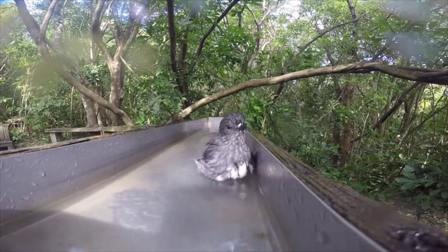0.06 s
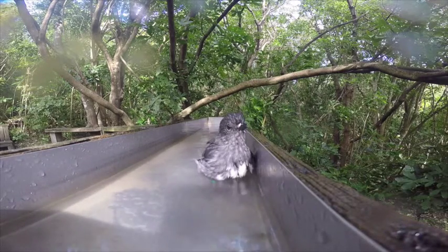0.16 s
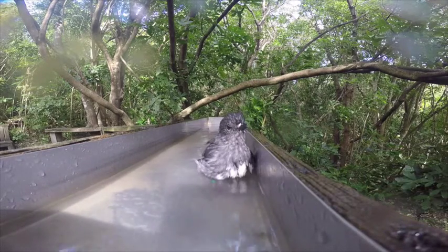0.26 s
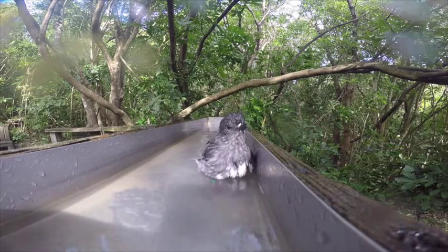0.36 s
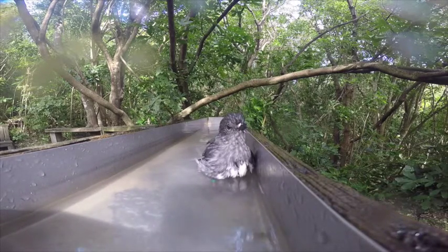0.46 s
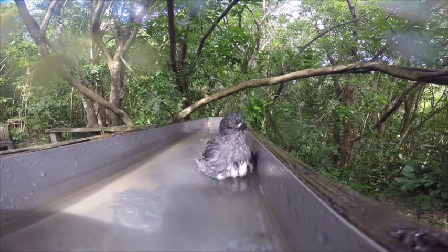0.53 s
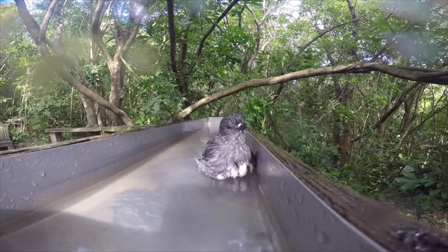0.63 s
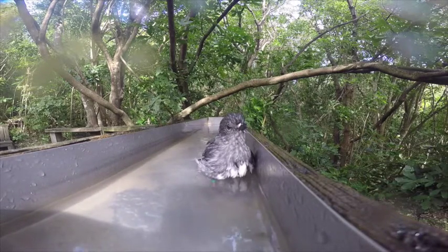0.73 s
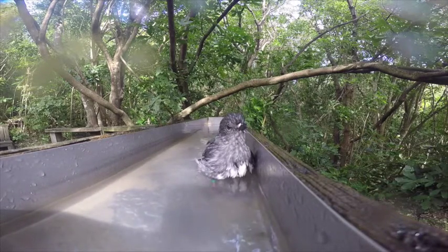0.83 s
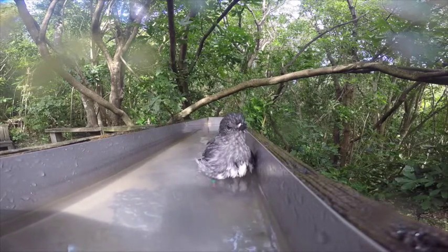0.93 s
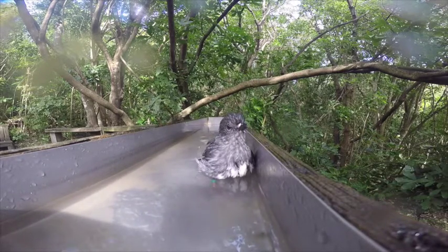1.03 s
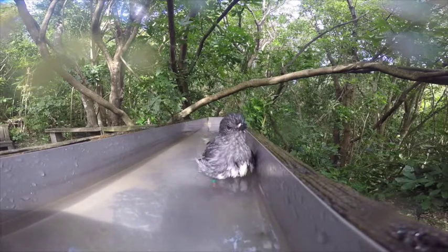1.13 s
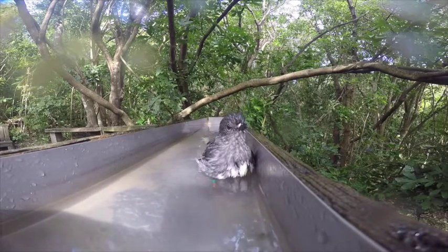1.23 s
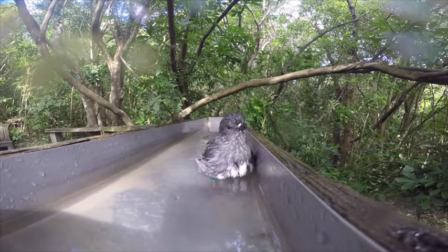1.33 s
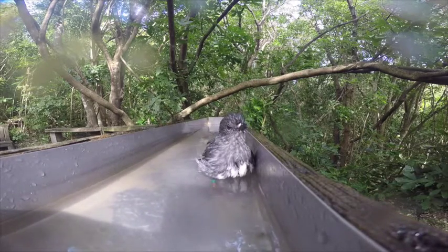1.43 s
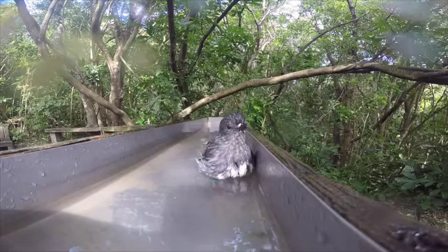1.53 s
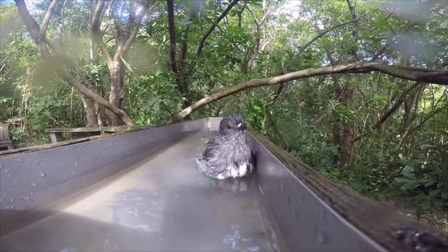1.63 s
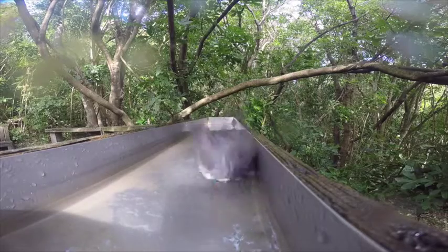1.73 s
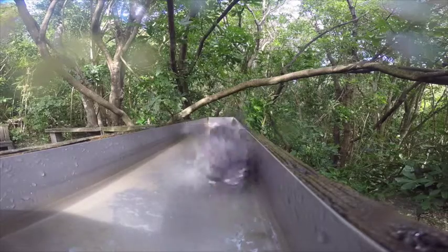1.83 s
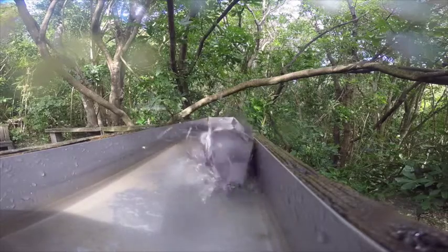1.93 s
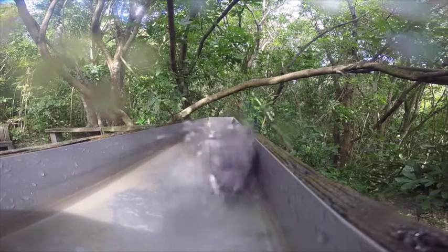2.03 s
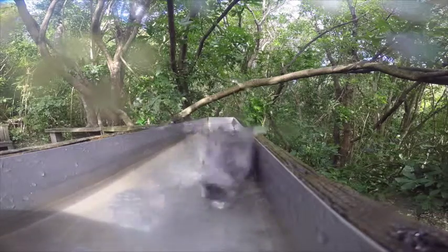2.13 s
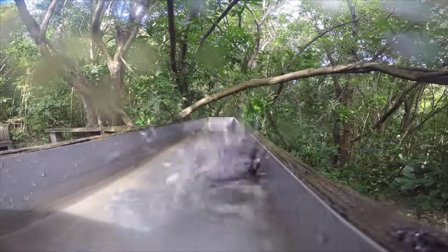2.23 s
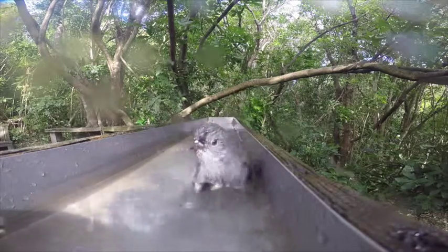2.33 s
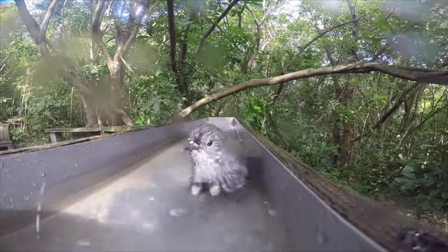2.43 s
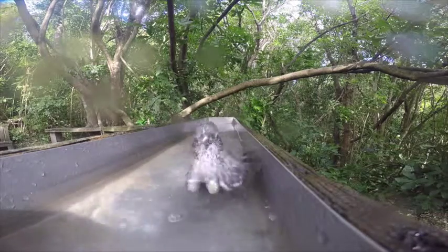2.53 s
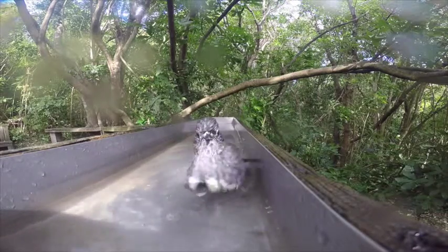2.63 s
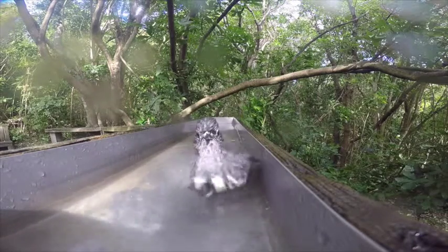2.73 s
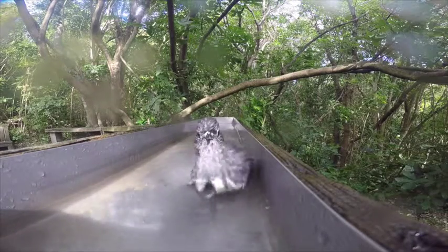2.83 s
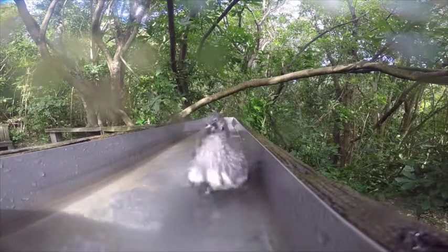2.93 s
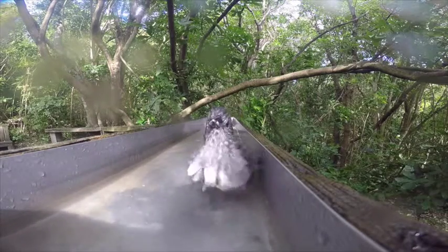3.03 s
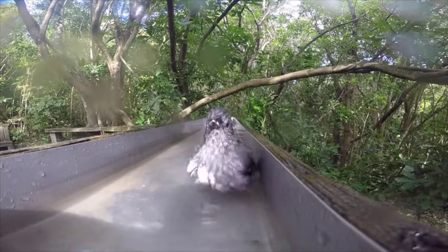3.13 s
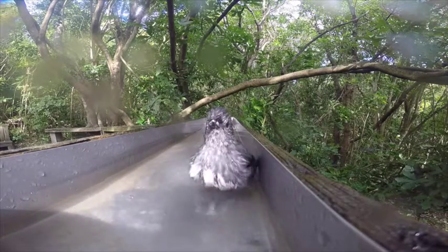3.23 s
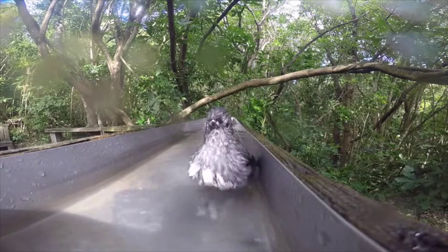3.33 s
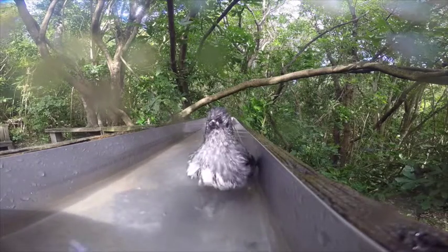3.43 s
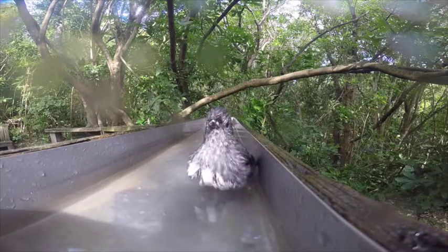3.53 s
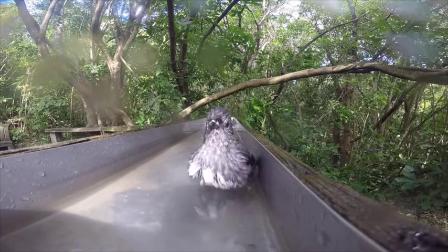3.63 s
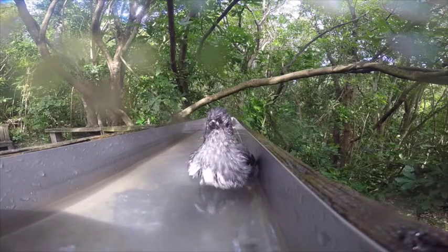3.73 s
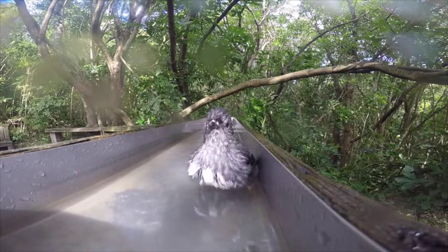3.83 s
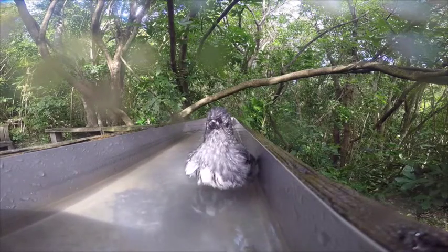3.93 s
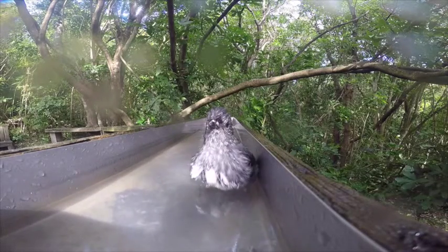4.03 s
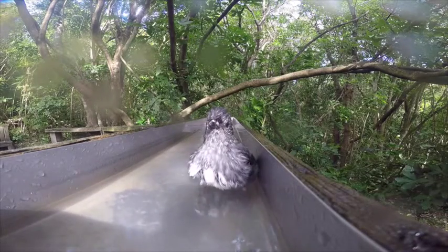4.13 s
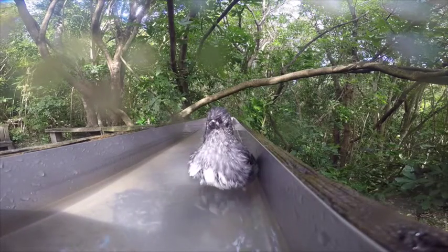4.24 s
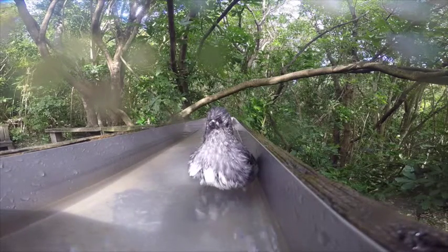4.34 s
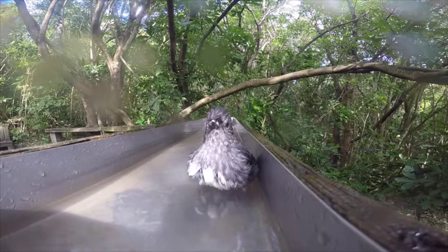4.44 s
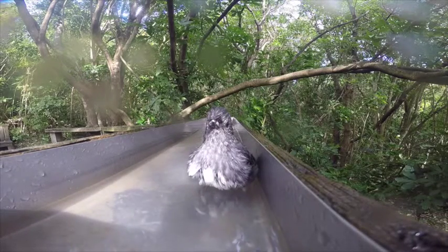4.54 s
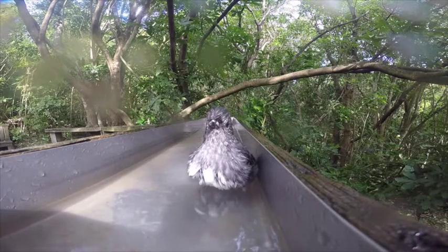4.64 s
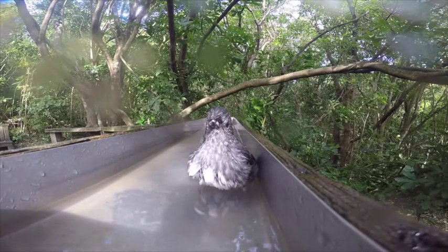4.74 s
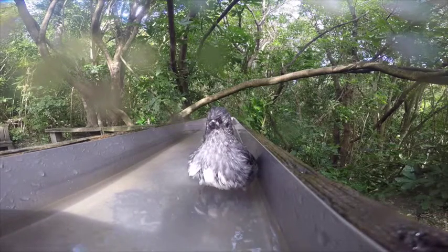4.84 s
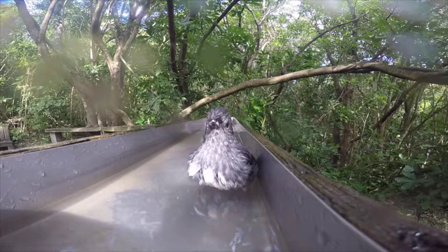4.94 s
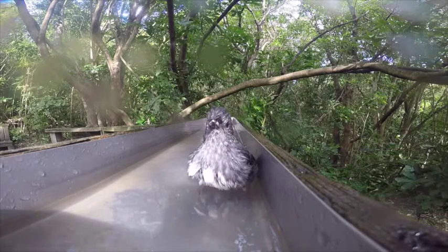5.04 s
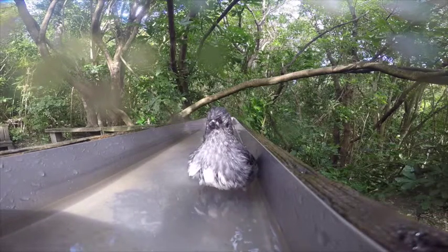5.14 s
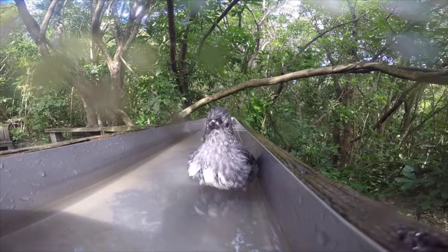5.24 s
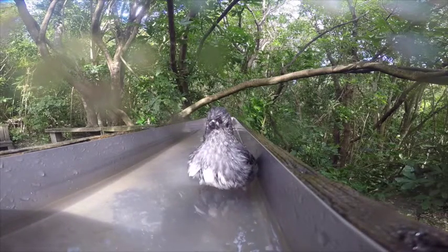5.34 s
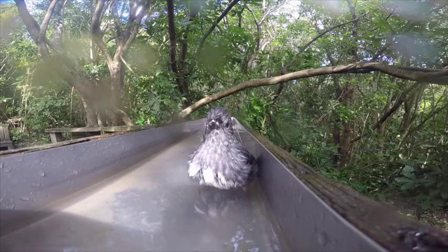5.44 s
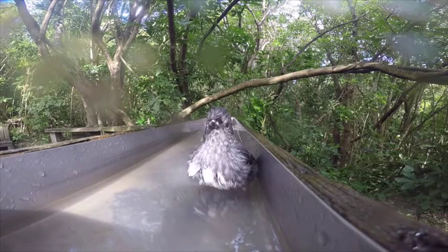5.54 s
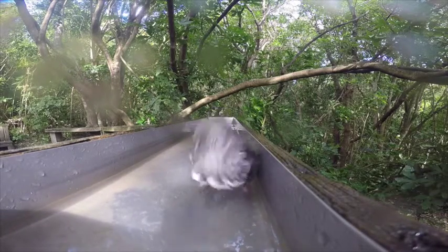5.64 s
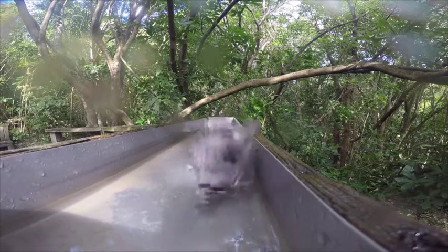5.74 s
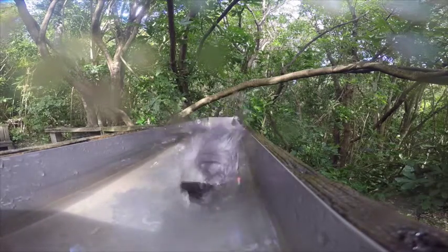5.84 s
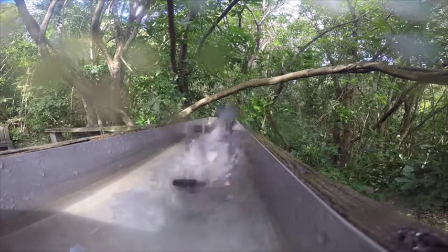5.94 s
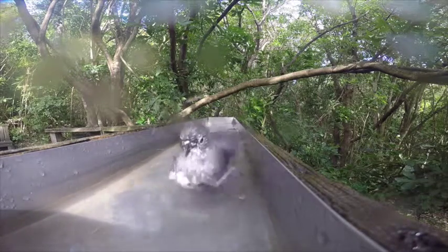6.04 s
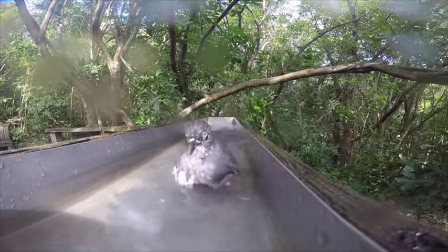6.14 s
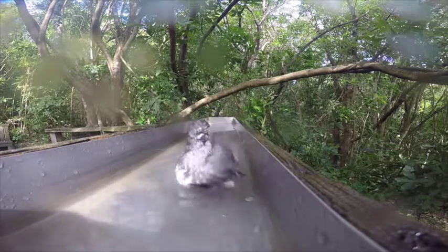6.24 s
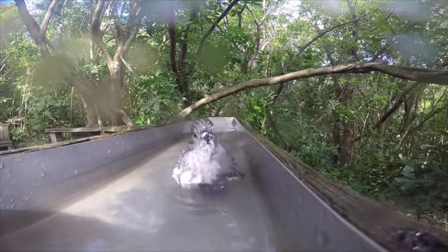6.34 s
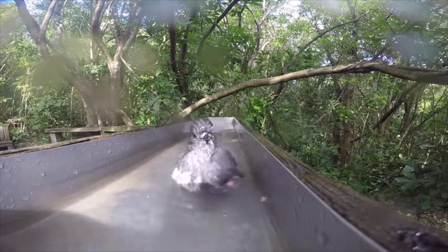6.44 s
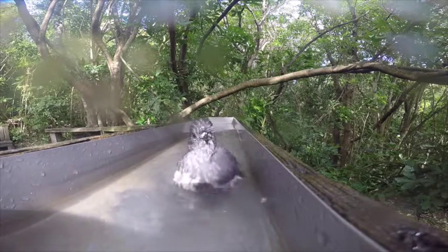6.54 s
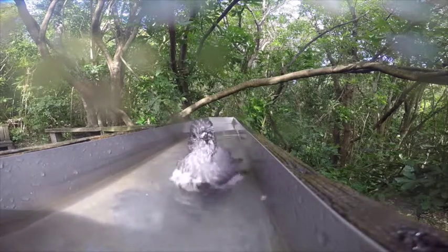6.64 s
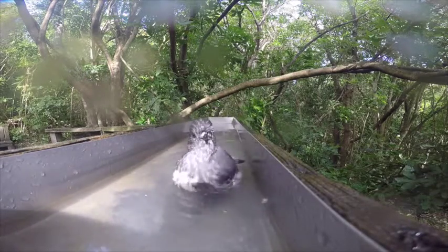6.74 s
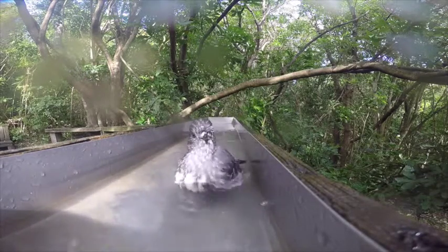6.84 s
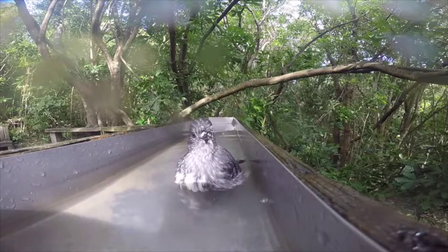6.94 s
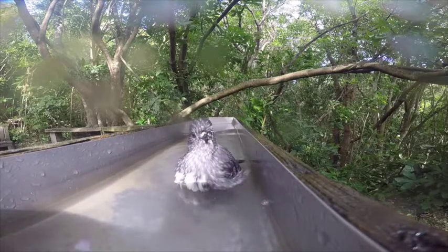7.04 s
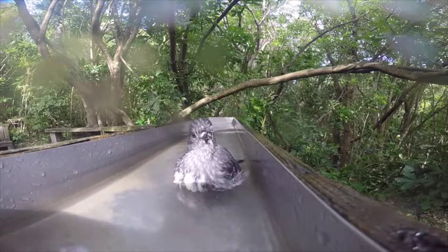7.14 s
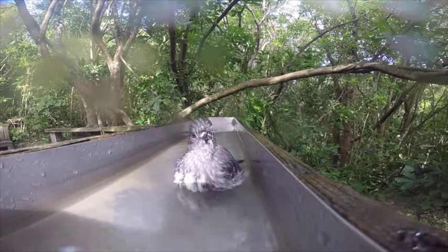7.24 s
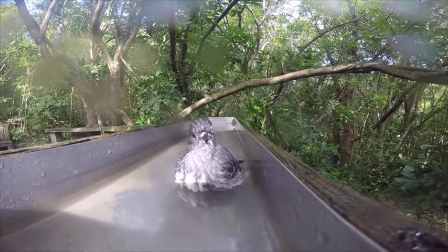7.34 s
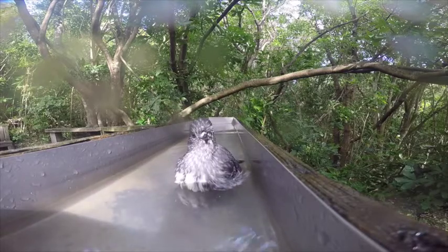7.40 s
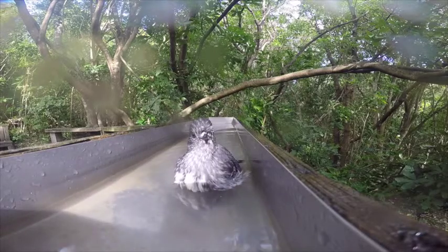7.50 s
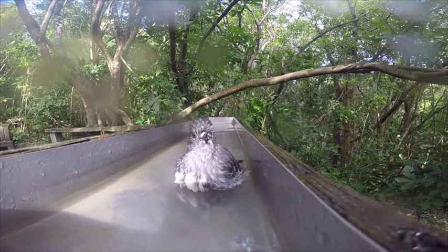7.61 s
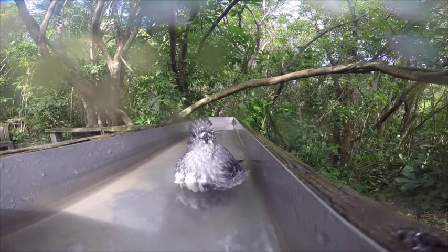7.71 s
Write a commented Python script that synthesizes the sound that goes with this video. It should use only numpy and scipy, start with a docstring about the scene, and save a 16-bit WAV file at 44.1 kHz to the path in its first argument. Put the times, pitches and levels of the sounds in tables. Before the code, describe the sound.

A small bird bathes in a shallow metal trough, heard close up in still woodland. It starts quietly, with soft air and a tiny wet tap. At about 1.7 seconds feathers swish, and the bird plunges with a hollow slap and a sharp metallic knock. Rapid wingbeats churn the water, loudest until 2.4 seconds, with pattering spray, ticking drops, small bubbles and a low boom from the trough floor. Lighter flutters continue until about 3.3 seconds. A pause follows, with faint laps and one small splash at 4 seconds. The second bout begins around 5.7 seconds with another plunge and knock, then quick splashing strokes that fade out by 7 seconds. The rest is quiet until the end, near 8 seconds. Very faint distant bird whistles come around 3.5, 5.2 to 5.6 and 7.5 seconds, and a barely audible thin electronic whine runs throughout.

```python
"""A shallow metal trough in still woodland, where a small bird bathes in two bouts.
Feet and wings knock and slosh, the breast plunges, feathers swish; the walls ring and the floor booms.
On top sits the wet detail: spray patters in sheets, drops tick, pockets of air ping as bubbles.
The pauses hold faint laps, soft air, far birds and the thin whine of a camera resting on the metal."""
import sys
import numpy as np
from scipy import signal
from scipy.fft import rfft, irfft, next_fast_len
from scipy.io import wavfile
from scipy.ndimage import uniform_filter1d

SR = 44100
rng = np.random.default_rng(int(sys.argv[2]) if len(sys.argv) > 2 else 0)


def master_out(mix):
    """Clip the mix to full scale and print it as 16-bit PCM to the path in sys.argv[1]."""
    frames = np.transpose(np.atleast_2d(mix))
    ceiling = np.clip(frames, -1, 1)
    pcm = np.round(ceiling * 32767).astype(np.int16)
    wavfile.write(sys.argv[1], SR, pcm)


N = 342657
T = np.arange(N) / SR

# strong wing strokes, each a knock and a sheet of spray: t/s, knock/dB, brightness/dB, spray/dB
WING_STROKES = [(0.002, -46.5, 0, -50.5), (1.792, -49, -8, -50), (1.8517, -21, -3, -43.5),
                (1.9295, -38, 11, -37), (2.019, -30, -1, -46), (2.07, -36.5, -1, -53),
                (2.093, -36, -4, -46.5), (2.169, -32, -0.5, -59), (2.195, -51, -9, -41.5),
                (2.248, -29, -8.5, -41), (2.298, -41, 2, -50), (2.34, -41.5, 6.5, -44),
                (2.521, -44.5, -1, -51.5), (2.62, -43, 2.5, -53.5), (2.79, -43.5, -3, -55),
                (3.141, -38.5, -5, -54.5), (3.173, -41.5, -3, -70), (3.231, -51, -4, -67),
                (4.0, -50.5, -1.5, -53), (5.722, -32.5, 3, -42.5), (5.7918, -22.5, -3, -41),
                (5.934, -38, 0.5, -41.5), (6.001, -39.5, 9.5, -38.5), (6.089, -45, 2, -45.5),
                (6.205, -38.5, -3, -52), (6.268, -40, -2.5, -51), (6.328, -33, -4, -47),
                (6.394, -32.5, -6.5, -48.5), (6.458, -34.5, -5.5, -52.5), (6.553, -42.5, -4, -55),
                (6.609, -39.5, -3, -51), (6.76, -46, -0.5, -58)]
# how hard the bird works the water, one curve a bout: t/s, level/dB
BOUT_EFFORT = [
    [(1.69, -66.5), (1.87, -37.5), (2.04, -34.5), (2.27, -34), (2.41, -44.5), (2.84, -45), (3.0, -52.5),
     (3.21, -45), (3.36, -72.5), (3.8, -74), (4.35, -75)],
    [(5.63, -66.5), (5.76, -44.5), (5.83, -38), (5.93, -45), (6.14, -48), (6.41, -44.5), (6.56, -45.5),
     (6.8, -49.5), (6.96, -70.5)],
]
# a knock's thud, body and clank: low f/Hz, high f/Hz, gain/dB
KNOCK_EQ = [(162, 753, -4), (807, 1320, 1.5), (1264, 3860, 1.5)]
# the trough's distinct modes: f/Hz, level/dB, t60/s
TROUGH_MODES = [(192, -13.5, 0.57), (264.4, -16, 0.55), (324, -7.5, 0.25), (357, -14.5, 0.6),
                (410.8, -5, 0.18), (483.6, -4.5, 0.0833), (515.3, -3, 0.1), (594, -17, 0.56),
                (620.6, 0.5, 0.091), (820, -15.5, 0.72), (878.8, -4.5, 0.217), (948, -16, 0.23),
                (1069, -9, 0.17), (1197, -13, 0.12), (1294, -6.5, 0.1), (1618, -11, 0.13),
                (1787, -10, 0.096), (1944, -10, 0.076), (2220, -8, 0.063), (2445, -21, 0.15),
                (2583, -5, 0.063)]
# tone of the dense wall modes: f/Hz, level/dB
WALL_EQ = [(90, 11), (200, -4), (550, 1), (720, -2.5), (900, 14), (1250, 2.5), (1450, -11.5), (1700, 0),
           (2050, -7), (2600, -4.5), (2850, -22), (4200, -17), (7000, -44.5), (16000, -77)]
# ring time of the dense wall modes: f/Hz, t60/s
WALL_DECAY = [(100, 0.73), (400, 0.21), (1000, 0.14), (2500, 0.22), (8000, 0.035)]
# the breast hits the water: t/s, level/dB, f/Hz
BREAST_PLUNGES = [(1.854, -13.5, 464), (2.117, -14.5, 322), (2.2499, -16, 342), (5.792, -13, 510)]
# the bird's weight rocks the floor: t/s, level/dB, hold/s
FLOOR_PRESSES = [(0.0, -45, 0.015), (1.94, -24.5, 0.08), (2.112, -19.5, 0.43), (2.961, -31, 0.04),
                 (3.16, -31.5, 0.1), (4.0, -54, 0.12), (5.782, -22.5, 0.19), (6.318, -33, 0.2),
                 (6.57, -33, 0.28)]
# low end of the water's heaving bulk: f/Hz, level/dB
HEAVE_EQ = [(15, -39), (30, -15.5), (55, -5), (72, 3.5), (88, -16.5), (108, 0.5), (122, 4), (150, 2),
            (200, -16.5), (280, -16), (600, -71)]
# feathers swish through the water, and faint laps touch the walls in the pauses: t/s, length/s, level/dB
WATER_SWISHES = [(0.55, 0.036, -61), (1.724, 0.057, -48.5), (1.822, 0.028, -30.5), (1.88, 0.029, -39),
                 (3.48, 0.05, -64.5), (3.645, 0.029, -61), (3.78, 0.015, -60.5), (3.93, 0.13, -52),
                 (4.304, 0.0286, -61.5), (5.652, 0.042, -46), (5.735, 0.08, -39.5), (6.8, .06, -49)]
# tone of spray and froth: f/Hz, level/dB
SPRAY_EQ = [(1500, 24.5), (3000, 9), (4200, 14.5), (5000, 0.5), (5700, 8.5), (7000, -1.5), (9000, -14),
            (10200, -3.5), (11800, -17), (13700, -5), (15200, -11.5)]
# the largest bubbles and wet squeaks: t/s, f/Hz, level/dB, fuzz/0-1
BIG_BUBBLES = [(1.887, 14400, -42.5, .9), (1.927, 2440, -19.5, 0.36), (2.022, 2470, -32.5, 0.15),
               (2.07, 1820, -29, 0.3), (2.137, 1690, -17.5, 0.8), (2.297, 2287, -29, 1),
               (2.31, 10400, -47, 0.4), (2.853, 2240, -33, .05), (3.126, 3700, -47.5, 0.5),
               (5.664, 10300, -36.5, 0.4), (5.68, 9200, -45.5, 0.8), (6.003, 1785, -33, 0.5),
               (6.045, 15100, -41.5, .9), (6.56, 1990, -42, 0.3), (6.611, 7000, -46.5, .9)]
# the closest drops: t/s, level/dB, f/Hz
NEAR_DROPS = [(1.962, -28.5, 4400), (2.005, -32, 8100), (2.1013, -34.5, 4300), (2.241, -37.5, 3980),
              (4.002, -44.5, 7000), (5.9642, -33, 4350), (5.987, -32, 4680), (6.177, -36.5, 6930),
              (6.243, -36, 4530), (6.298, -25.5, 4290), (6.66, -34.5, 4360)]
# tone of the still air: f/Hz, level/dB
AIR_EQ = [(10, -11.5), (30, 2), (100, -11.5), (200, -19), (400, -23.5), (1200, -28.5), (3000, -31),
          (5900, -33), (7200, -36.5), (10000, -39), (15000, -41.5)]
# far birds' whistles and a thin wheeze: t/s, length/s, f/Hz, level/dB, waver/Hz
FAR_CALLS = [(3.546, 0.54, 4420, -71, 136), (3.58, 0.51, 11000, -79, 190), (5.152, 0.27, 1745, -67, 11),
             (5.48, 0.17, 1830, -60.5, 9), (7.477, 0.24, 1635, -61.5, 6)]


def wingbeats(per_s=14, bright_db=-4, spray_db=-12, spread_db=-0.5, jitter_s=0.008):
    """The rhythm: lighter beats, as hard as the effort, fill in between the strong strokes."""
    beats = list(WING_STROKES)
    for (start, *_), (end, *_) in zip(WING_STROKES, WING_STROKES[1:]):
        for s in np.linspace(start, end, round((end - start) * per_s) + 1)[1:-1]:
            late, hard, wet = rng.standard_normal(3)
            db = effort_db(s)
            knock_db, sheet_db = db + spread_db * hard, db + spray_db + spread_db * wet
            beats.append((s + jitter_s * late, knock_db, bright_db, sheet_db))
    return [beat for beat in beats if beat[1] > -100]  # skip the silent beats


def knocks(taps, beats, slop=0.17, slop_s=0.0044, hard_db=-22, soften=0.16):
    """Each blow hits the metal with a sharp push and a short slop; lighter blows are more slop."""
    out, t = np.zeros(N), T[:SR // 10]
    for k, (s, knock_db, bright_db, _) in enumerate(beats):
        levels = knock_db + bright_db * np.array([-1, 0, 1])  # brightness trades thud for clank
        wet = slop * amp(soften * (hard_db - max(levels)))
        push = wet * patter(len(t), 4000, 1.18) * np.exp(-t / slop_s)
        push[0] = 1  # the hard attack
        rung = signal.fftconvolve(push, taps[k % len(taps)])
        for db, (lo, hi, gain_db) in zip(levels, KNOCK_EQ):
            add(out, s, amp(db + gain_db) * crest(band(rung, lo, hi)))
    return out


def trough_tap(wall_db=4, flex_db=-4):
    """The trough's answer to one tap: a first flex, a wash of dense wall modes and distinct ringing."""
    t = T[:SR * 3 // 4]
    hz, frame_s, noise = signal.stft(rng.standard_normal(len(t)), SR, nperseg=256)
    decay = amp(-60 * frame_s / curve_at(WALL_DECAY, hz)[:, None])
    wash = signal.istft(noise * decay, SR, nperseg=256)[1][:len(t)]
    flex = signal.unit_impulse(len(t), 24)
    wall = unit(eq(unit(wash) + amp(flex_db) * unit(flex), WALL_EQ) * (t < t[-1] / 2))
    # each mode starts up or down, by where the tap lands
    ring = sum(rng.choice([-1, 1]) * amp(db - 60 * t / t60) * np.sin(2 * np.pi * f * t)
               for f, db, t60 in TROUGH_MODES)
    return unit(ring) + amp(wall_db) * wall


def plunges(taps, ring_db=-9, cycles=0.89):
    """The breast lands with a hollow slap of a couple of cycles; the walls give it a ringing tail."""
    out, t = np.zeros(N), T[:SR // 2]
    for k, (s, db, hz) in enumerate(BREAST_PLUNGES):
        slap = np.sin(2 * np.pi * hz * t) * np.exp(-(hz * t / cycles - 0.5) ** 2)
        tail = crest(signal.fftconvolve(slap, taps[k % len(taps)])[:len(t)])
        add(out, s, amp(db) * (slap + amp(ring_db) * tail))
    return out


def floor_boom(stir, surge, boom_hz=85.8, jostle_hz=15, most_hz=13, upper_hz=135, upper_db=-19,
               rise_s=0.055, free_db_per_s=44, damped_db_per_s=38, calm_db=-54):
    """The floor's lowest mode: its pitch is jostled while the bird moves, a pure hum as it dies away."""
    damping = stir / (stir + amp(calm_db))  # stirred water damps the floor
    lost_db = np.cumsum(free_db_per_s + damped_db_per_s * damping) / SR
    swing = np.full(N, 1e-9)
    for s, db, hold_s in FLOOR_PRESSES:
        attack = np.clip((T - s) / min(rise_s, hold_s / 2), 0, 1)
        fallen_db = np.maximum(lost_db - np.interp(s + hold_s, T, lost_db), 0)
        swing = np.maximum(swing, attack * amp(db - fallen_db))
    hz = boom_hz + np.minimum(jostle_hz * surge / swing, most_hz) * drift(N, 14.3)
    upper = amp(upper_db) * drift(N, 10) * np.sin(2 * np.pi * upper_hz * T)  # the next modes beat
    return swing * (np.sin(2 * np.pi * np.cumsum(hz) / SR) + upper)


def churn(taps, stir, surge, slosh_db=1.5, heave_db=6, fizz_db=-8.5, clump_db=3):
    """Countless small slaps stir the metal, the water's bulk heaves below, and froth fizzes on top."""
    slaps = sum(signal.oaconvolve(unit(patter(N, 160, 7)) * stir, tap)[:N] for tap in taps)
    slosh = band(slaps / np.linalg.norm(taps), 260, 9000, order=2)
    heave = unit(eq(rng.standard_normal(N), HEAVE_EQ)) * surge
    froth = unit(eq(patter(N, 6000, 1.7), SPRAY_EQ))
    fizz = froth * stir * amp(clump_db * (drift(N, 25) - 0.5))
    return amp(slosh_db) * slosh + amp(heave_db) * heave + amp(fizz_db) * fizz


def water_surge(stir, lag_s=0.045, shove_db=-21, shove_s=0.025):
    """Envelope of the water's bulk: it lags behind the bird, and each plunge shoves it."""
    push = stir.copy()
    for s, db, _ in BREAST_PLUNGES:
        add(push, s, np.full(round(shove_s * SR), amp(db + shove_db)))
    pole = np.exp(-1 / (lag_s * SR))
    return signal.lfilter([1 - pole], [1, -pole], push)


def swishes(taps, follow_s=0.04, follow_db=-4, knock_cap_db=-33):
    """Swishing feathers and faint laps send a bright rush into the walls; each strong stroke adds one."""
    out = np.zeros(N)
    follow = [(s, follow_s, min(db, knock_cap_db) + follow_db) for s, db, _, _ in WING_STROKES]
    for k, (s, length, db) in enumerate(WATER_SWISHES + follow):
        count = round(length * SR)
        water = patter(count, 6000, 2.6) * signal.windows.tukey(count, 0.5)
        rush = signal.fftconvolve(water, taps[k % len(taps)])
        add(out, s, amp(db) * crest(band(rush, 650, 8000, order=2)))
    return out


def spray(beats, sizzle_db=-6.5, hold_s=0.0082, fall_s=0.018, heavy_db=-45, fineness=0.1):
    """A sheet of droplets lands at once, holds and thins out; light sheets are finer and sizzle more."""
    out, t = np.zeros(N), T[:SR // 6]
    envelope = np.exp(-np.maximum(t - hold_s, 0) / fall_s)
    for s, _, _, db in beats:
        sheet = eq(patter(len(t), 10000, 2.8), SPRAY_EQ) * envelope
        hiss, sizzle = crest(band(sheet, 2700, 6400)), crest(band(sheet, 6400, 16000))
        add(out, s, amp(db) * (hiss + amp(sizzle_db + fineness * (heavy_db - db)) * sizzle))
    return out


def bubbles(fuzz_share=0.031, swell_s=0.006, glide_octaves_per_s=-3, small_fuzz=0.72):
    """Air pockets ring briefly and slide down; squeezed ones flutter, small ones gurgle at random."""
    out, t = np.zeros(N), T[:SR // 10]
    gurgles = scatter(count=10, offset_db=-4.5, lo_hz=1526, hi_hz=2520)
    small = [(s, hz, db, small_fuzz) for s, db, hz in gurgles]
    for s, hz, db, fuzz in BIG_BUBBLES + small:
        width_hz = 150 + fuzz_share * hz
        flutter = 1 - fuzz + fuzz * (drift(len(t), width_hz) + 1j * drift(len(t), width_hz))
        turns = np.cumsum(hz * 2 ** (glide_octaves_per_s * t)) / SR
        tone = (flutter * np.exp(2j * np.pi * turns)).real
        add(out, s, amp(db) / np.sqrt(2) * crest(tone * t * np.exp(-t / swell_s)))
    return out


def drops(gain_db=1, ring_s=0.00066):
    """Dry ticks, a few cycles of ring in a tiny splat; smaller drops fall around the near ones."""
    out, t = np.zeros(N), T[:SR // 100]
    for s, db, hz in NEAR_DROPS + scatter(count=24, offset_db=-7.5, lo_hz=3900, hi_hz=7340):
        splat = unit(band(rng.standard_normal(len(t)), 2200, 9000, order=2))
        tick = (np.sin(2 * np.pi * hz * t) + splat) * t * np.exp(-t / ring_s)
        add(out, s, amp(db + gain_db) * tick / abs(tick).max())
    return out


def woodland(air_db=-57):
    """The bed: still air, with soft, wavering calls fading in and out far off."""
    out = amp(air_db) * unit(eq(rng.standard_normal(N), AIR_EQ))
    for s, length, hz, db, waver_hz in FAR_CALLS:
        count = round(length * SR)
        turns = np.cumsum(hz + waver_hz * drift(count, 4 * waver_hz)) / SR
        add(out, s, amp(db) * np.hanning(count) * np.sin(2 * np.pi * turns))
    return out


def camera_whine(whine_hz=6307, whine_db=-65, octave_db=-16, pip_hz=8543, pip_db=-70, frame_hz=29.97):
    """A thin whine that restarts with every frame, and a faint pip in step with it."""
    turns = whine_hz * (T % (1 / frame_hz))
    whine = np.sin(2 * np.pi * turns) + amp(octave_db) * np.sin(2 * np.pi * 2 * turns)
    gate = np.sin(np.pi * (frame_hz * T + 1 / 3)) ** 16
    pip = gate * np.sin(2 * np.pi * pip_hz * T + 0.5 * drift(N, 120))
    return amp(whine_db) * whine + amp(pip_db) * pip


def effort_db(s):
    """The bird's effort at time s; still between bouts."""
    return np.max([np.interp(s, *np.transpose(bout), left=-120, right=-120) for bout in BOUT_EFFORT], 0)


def scatter(count, offset_db, lo_hz, hi_hz, spread_db=3):
    """Small events sprinkled over each bout, riding the effort: t/s, level/dB, f/Hz."""
    rows = []
    for bout in BOUT_EFFORT:
        start, end = bout[0][0], bout[-1][0]
        when, size, pitch = rng.random((count, 3)).T
        s = start + (end - start) * (np.arange(count) + when) / count
        db = effort_db(s) + offset_db + spread_db * (2 * size - 1)
        rows += zip(s, db, lo_hz * (hi_hz / lo_hz) ** pitch)
    return rows


def patter(count, per_s, spread_db):
    """Random tiny impacts, a few of them large."""
    size = amp(spread_db * np.minimum(rng.exponential(1, count), 4))
    return size * rng.choice([-1, 1], count) * (rng.random(count) < per_s / SR)


def drift(count, hz):
    """Random wobble of rms 1, rolled off above hz."""
    rolloff = 1 + (np.fft.rfftfreq(count, 1 / SR) / hz) ** 4
    return unit(irfft(rfft(rng.standard_normal(count)) / rolloff, count))


def eq(x, points):
    """Shapes x with an EQ curve: f/Hz, gain/dB."""
    size = next_fast_len(len(x))
    gain = amp(curve_at(points, np.fft.rfftfreq(size, 1 / SR)))
    return irfft(rfft(x, size) * gain, size)[:len(x)]


def curve_at(points, hz):
    """Reads a curve on a log-frequency axis."""
    f, value = np.transpose(points)
    return np.interp(np.log(hz + 1), np.log(f + 1), value)


def band(x, lo_hz, hi_hz, order=3):
    """Causal band-pass."""
    return signal.sosfilt(signal.butter(order, [lo_hz, hi_hz], "band", fs=SR, output="sos"), x)


def amp(db):
    """Decibels to gain."""
    return 10 ** (np.asarray(db) / 20)


def unit(x):
    """Scales to rms 1."""
    return x / np.sqrt(np.mean(x ** 2) + 1e-20)


def crest(x, size=256):
    """Scales so that the loudest few milliseconds have rms 1."""
    return x / np.sqrt(uniform_filter1d(x ** 2, size).max() + 1e-20)


def add(mix, s, sound):
    """Mixes a sound in at time s."""
    part = mix[max(round(s * SR), 0):][:len(sound)]
    part += sound[:len(part)]


def scene(spots=4):
    """The mono mix: metal, wet detail, background. The trough rings a little differently at each spot."""
    taps, beats = [trough_tap() for _ in range(spots)], wingbeats()
    stir = amp(effort_db(T))
    surge = water_surge(stir)
    hits = knocks(taps, beats) + plunges(taps)
    metal = hits + swishes(taps) + churn(taps, stir, surge) + floor_boom(stir, surge)
    return (metal + spray(beats) + drops() + bubbles() + woodland() + camera_whine())[None]


def record(dry):
    """A steep high cut at 15.4 kHz on the whole mix."""
    high_cut = signal.firwin(255, 15400, window=("kaiser", 9), fs=SR)
    return signal.oaconvolve(dry, high_cut[None], "same")


dry = scene()
out = record(dry)
master_out(out)
```